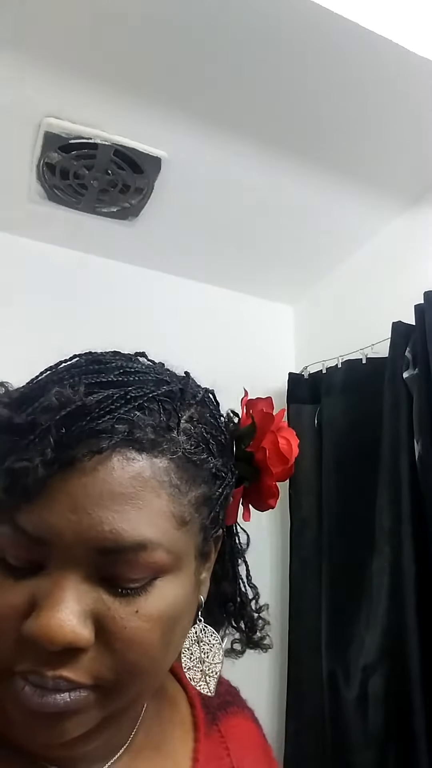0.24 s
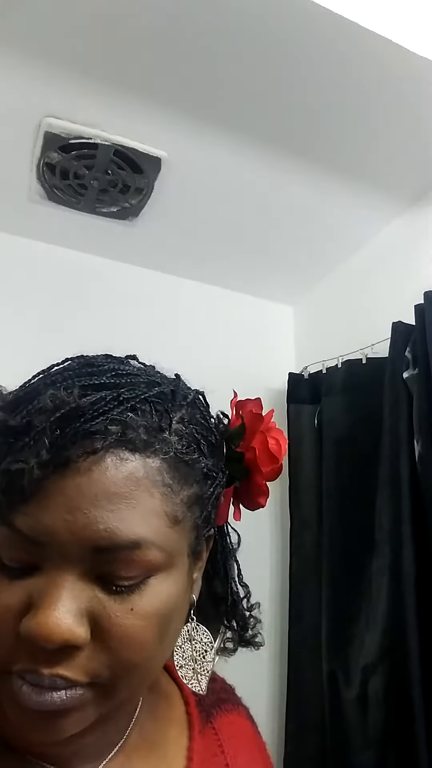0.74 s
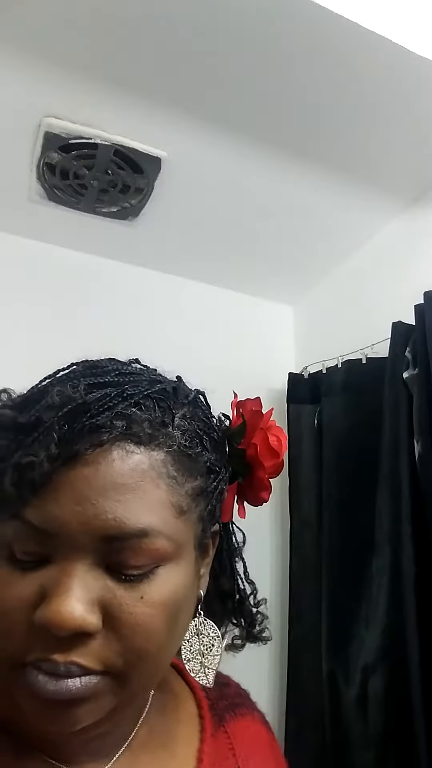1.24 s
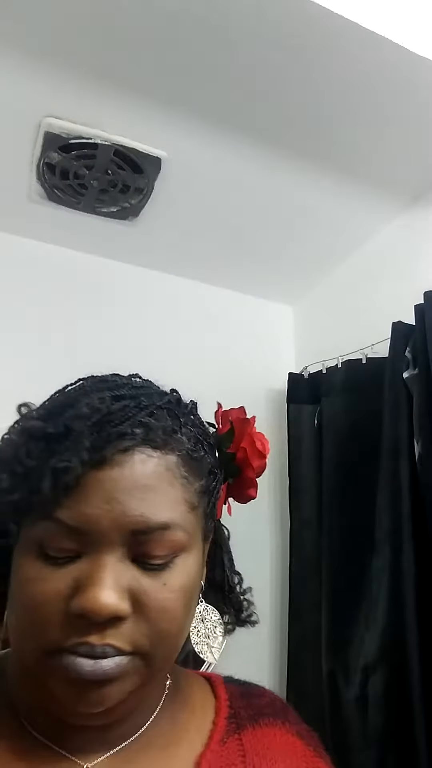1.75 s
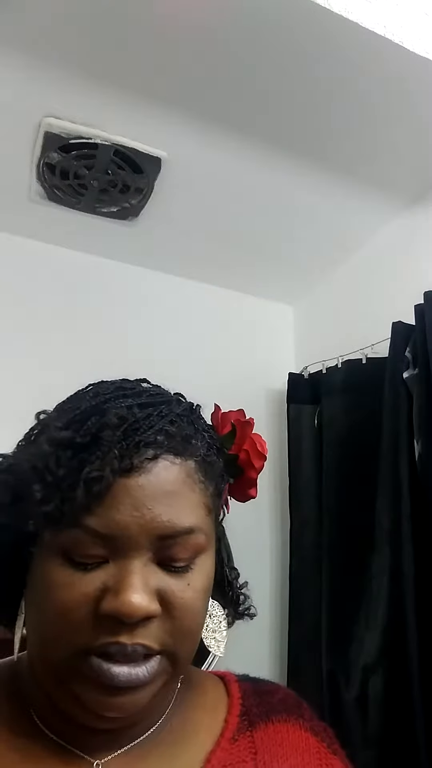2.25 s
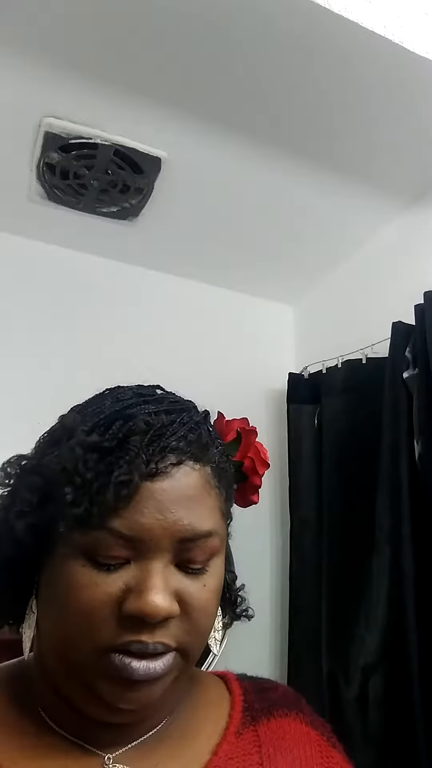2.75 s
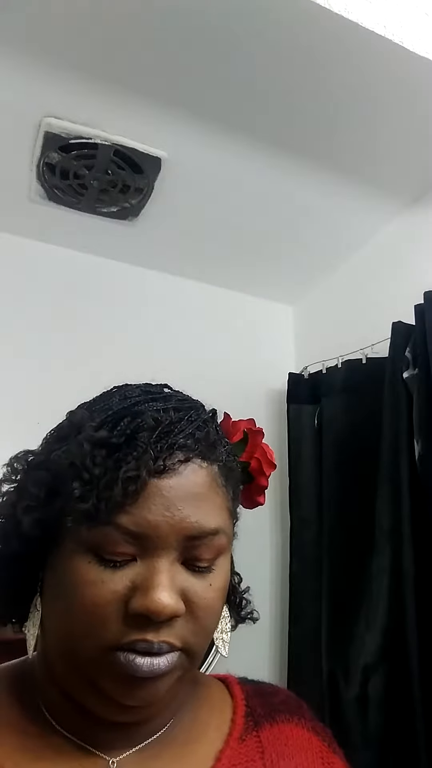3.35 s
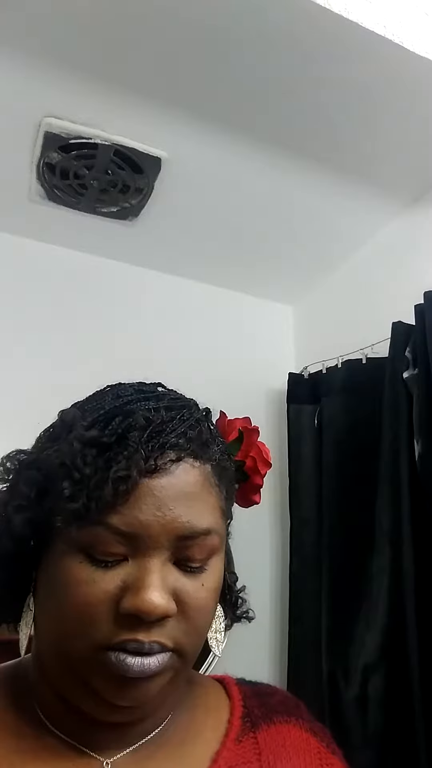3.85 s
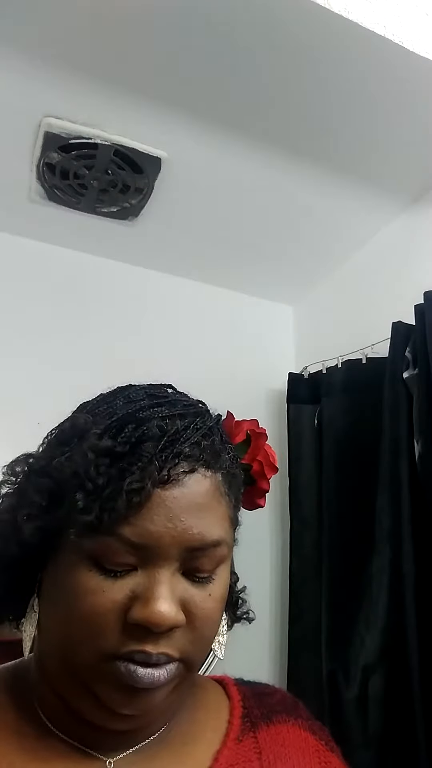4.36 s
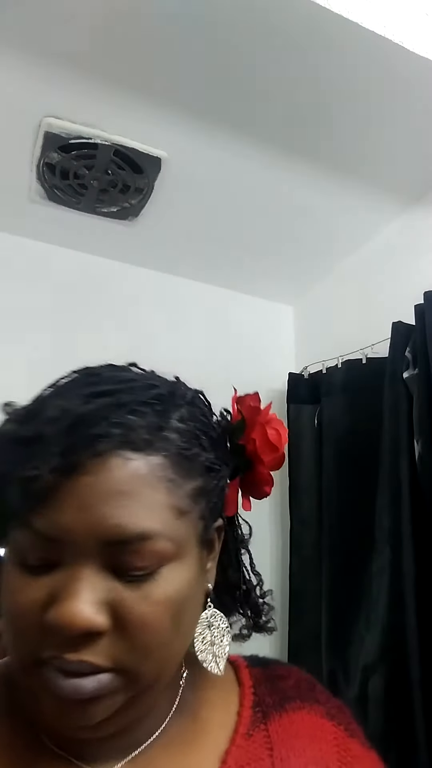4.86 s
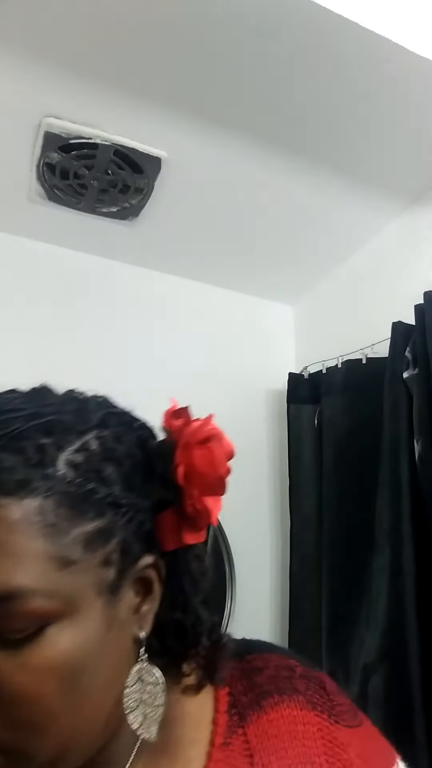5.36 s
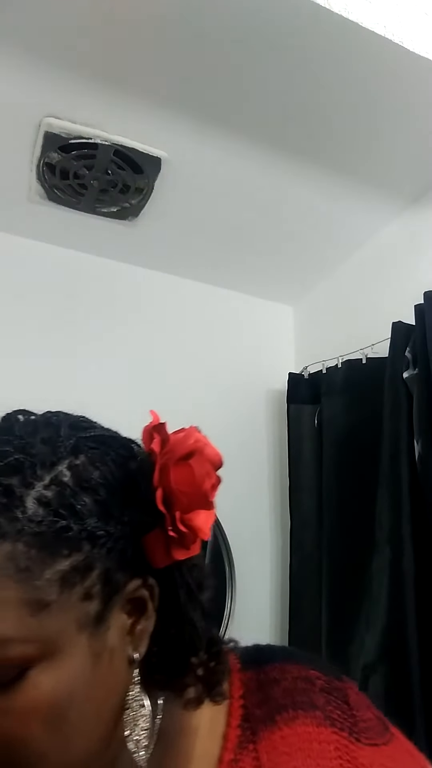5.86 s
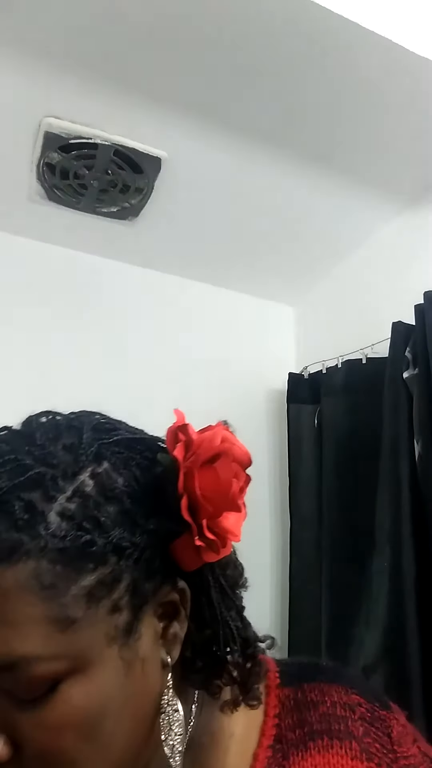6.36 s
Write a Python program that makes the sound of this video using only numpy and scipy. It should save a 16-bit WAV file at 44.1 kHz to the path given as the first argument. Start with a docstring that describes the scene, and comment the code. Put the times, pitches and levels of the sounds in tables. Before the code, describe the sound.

Close stereo phone pickup of makeup items being handled. Hissy rummaging strokes and soft knocks come first, then one bright, hard plastic clack with a short ring. Light ticks and taps continue irregularly, with a tighter cluster of crisp clicks later. Near the end someone leans past, giving deep muffled rumbles, firm scrapes and a heavy thud. Short small-room echoes and very faint air noise surround it all.

```python
"""Short rustling strokes are heard first, as plastic makeup tubes slide over each other in a small room: noise grains.
Dull bumps fall among them; then tubes click together and one lands hard and rings: noise bursts and decaying sines.
At the end someone leans past the nearby phone: a low rumble, a muffled rub and one heavy bump, from swelling noise.
Echoes follow the contacts and the sliding, faint air noise lies under all, and two microphone ports colour it.
"""
import sys
import numpy as np
from scipy import signal
from scipy.fft import rfft, irfft, next_fast_len
from scipy.io import wavfile
from scipy.ndimage import uniform_filter1d

SR = 44100
rng = np.random.default_rng(int(sys.argv[2]) if len(sys.argv) > 2 else 0)


def to_wav(sig):
    """Store sig (one row per channel, or 1-D mono) as 16-bit WAV at the path in sys.argv[1].

    Samples outside -1..1 are clipped; the rate is SR.
    """
    pcm = np.clip(np.atleast_2d(sig), -1, 1) * 32767
    pcm = np.round(pcm).astype(np.int16)
    wavfile.write(sys.argv[1], SR, pcm.T)  # frames by channels


N = 291677  # length [samples]

# One item slid over the others: (time at its fastest [s], half-length [s],
# hiss level of light sliding [dB], scrape level of firm rubbing [dB])
SLIDING_STROKES = [(0.02, 0.094, -45.5, -51), (0.16, 0.1087, -37.5, -42), (0.4, 0.0925, -40, -43.5),
                   (0.52, .04, -41, -38), (0.74, 0.11, -44.5, -43.5), (0.92, 0.0983, -39.5, -40),
                   (1.0, 0.06, -43.5, -37.5), (1.12, 0.063, -44, -44), (1.29, 0.091, -45, -47.5),
                   (1.57, 0.096, -57, -59), (2.02, 0.0417, -58.5, -52.5), (2.255, 0.0208, -54.5, -38.5),
                   (2.335, 0.024, -55.5, -45.5), (2.535, 0.0115, -52.5, -43), (2.79, 0.0228, -62, -55.5),
                   (2.94, 0.0265, -72, -53.5), (3.085, 0.0193, -58.5, -57.5), (3.28, 0.0387, -53, -55.5),
                   (3.455, 0.0107, -55.5, -53.5), (3.61, 0.0281, -57, -55), (3.925, 0.0382, -51.5, -53),
                   (4.25, 0.059, -61, -57), (4.4, 0.118, -80.5, -51), (4.635, 0.0497, -52, -45.5),
                   (4.765, 0.0209, -50.5, -40.5), (4.86, 0.087, -60, -60), (5.365, .02, -45, -40.5),
                   (5.41, 0.0367, -58.5, -52), (5.64, 0.047, -83.5, -49), (5.74, 0.01456, -61.5, -34.5),
                   (5.905, 0.0505, -63.5, -35), (6.028, 0.0309, -49, -33.5), (6.195, 0.0155, -39, -25),
                   (6.24, 0.0271, -44, -33), (6.34, 0.0164, -51.5, -65)]
# The fingers never quite rest on the items: (time [s], hiss level [dB], scrape level [dB])
GRIP_LEVELS = [(0, -49.5, -72), (1.8, -63, -61.5), (1.92, -70.5, -74), (2.15, -60.5, -54.5),
               (2.6, -64, -60.5), (3.15, -79, -62), (3.75, -66.5, -67.5), (4.1, -68, -61.5),
               (5.15, -68.5, -57), (5.5, -75.5, -61.5), (6.1, -69, -45.5), (6.6, -79, -57)]
# The body shifts beside the phone:
# (time at its fastest [s], half-length [s], rumble level [dB], muffled rub level [dB])
BODY_LEANS = [(5.31, 0.0364, -22.5, -47), (5.42, 0.0716, -34, -41), (5.74, 0.0672, -14.5, -31),
              (5.88, 0.0673, -9.5, -20), (6.025, 0.0654, -9.5, -17), (6.2, 0.032, -9, -15),
              (6.4, 0.171, -32, -45)]
# Soft bumps: (time [s], knock level [dB], hollow note [Hz], shell level [dB], decay time [s])
SOFT_BUMPS = [(0.432, -3, 877, -4.5, 0.02), (0.515, -14.5, 401, -20.5, 0.0057),
              (0.7, -20.5, 580, -37.5, 0.0126), (0.815, -10, 882, -20, 0.0053),
              (0.985, -12.5, 667, -16, 0.01), (1.042, -10, 687, -22.5, 0.0124),
              (1.065, -28, 620, -33.5, 0.011), (1.128, -21.5, 565.0, -9, 0.0179),
              (1.156, -15, 630, -16.5, 0.0148), (1.18, -14.5, 507, -28.5, 0.0083),
              (2.242, -20, 733, -19, 0.0058), (2.345, -23, 700, -19.5, 0.0087),
              (2.375, -10.5, 500, -20, 0.00834), (3.314, -24, 617, -36.5, 0.00427),
              (3.581, -27, 852, -44, 0.0076), (4.828, -25, 494, -29.5, 0.006),
              (6.018, -10.5, 522, -19, 0.0138), (6.169, -0.5, 618, -15.5, 0.0203),
              (6.195, -22.5, 937.0, -3, 0.0201), (6.316, -20.5, 575, -24.5, 0.0146)]
# Plastic touching plastic: (time [s], snap level, strongest near 11 kHz [dB],
# shell level, mostly 1-5 kHz [dB], knock level, mostly under 1 kHz [dB])
PLASTIC_CLICKS = [(1.9541, -25.5, -26, -18), (2.1788, -23, -14, -25), (2.2454, -26.5, -28, -16),
                  (2.3018, -23, -29.5, -37.5), (2.3497, -21, -15, -23.0), (2.3602, -19.5, -33.5, -14.5),
                  (2.374, 1.5, 0, -23), (2.3757, 4, -4.5, -21.5), (2.3777, -7, -0.5, -24.5),
                  (2.5041, -30.5, -51, -51.5), (2.541, -20.5, -28, -40), (2.5913, -26.5, -30.5, -19),
                  (2.624, -26.5, -33.5, -25), (2.7176, -36, -31, -23.5), (2.8337, -16.5, -20, -44.5),
                  (2.8846, -31, -27, -42), (2.9177, -34, -27.5, -21.5), (3.007, -28.5, -27, -14.5),
                  (3.1985, -37, -38.5, -39.5), (3.3663, -28.5, -22.5, -34.5), (3.51, -24, -59.5, -52.5),
                  (3.5176, -26, -51, -58.5), (3.5198, -15.5, -61, -54), (3.6817, -26.5, -58.5, -45),
                  (3.6942, -24.5, -51.5, -34), (3.821, -26, -49.5, -25.5), (3.8284, -24, -27.5, -21),
                  (3.874, -30, -29, -16.5), (4.0165, -29, -44.5, -44.5), (4.043, -26.5, -25.5, -31.0),
                  (4.0483, -26, -26.5, -23), (4.0936, -12, -26.5, -26.5), (4.1545, -3, -21.5, -18),
                  (4.217, -31, -22, -18.5), (4.2282, -27, -42, -47.5), (4.2942, -6.5, -22, -26.5),
                  (4.3283, -25.5, -24, -21), (4.4477, -6, -10.5, -8.5), (4.4534, -1, -4.5, -11),
                  (4.457, -7.5, -17.5, -35), (4.5002, -34, -17.5, -14), (4.5721, -27, -36, -43.5),
                  (4.606, -19.5, -38, -31.5), (4.6507, -10, -30.5, -26), (4.658, -16.5, -16.5, -12),
                  (4.7152, -33, -15.5, -15), (4.7208, -11.5, -32, -29), (4.7443, -13.5, -27, -36),
                  (4.7626, -21, -42, -41), (5.0449, -23.5, -54, -52.5), (5.0879, -20.5, -22, -38.5),
                  (5.1102, -38, -25, -24), (5.1971, -26, -48, -42.5), (6.176, -25, -13.5, -8.5),
                  (6.5034, -25, -33, -29)]
# A tube set down hard: (time [s], level of its clear modes [dB], level of its dense clatter [dB],
# level of the thump in the counter [dB])
HARD_BLOWS = [(2.3746, -28.5, 1, 1.5)]
# The clear modes of the tube: (frequency [Hz], level [dB], t60 [s])
TUBE_MODES = [(1437, -9, 0.19), (1514.3, 1.5, .17), (1605.7, 1.5, 0.16), (1743, -4.5, .1),
              (2340, -12.5, 0.17), (3880, -13.5, 0.051), (5163, -15, .13), (7101, -18, .14),
              (8123, -15, .12)]

# Spectra of light sliding and of firm rubbing: (frequency [Hz], level [dB])
HISS_SPECTRUM = [(200, -12.5), (1000, -24.5), (3000, -2), (6000, -1.5), (10000, -0.5), (16000, 0)]
SCRAPE_SPECTRUM = [(40, -26.5), (150, -8), (400, -1.5), (800, 0.5), (1250, -1.5), (1700, 0.5), (3000, -4),
                   (5000, -6.5), (8000, -22.5), (16000, -40.5)]
# Spectra of the low rumble and of the muffled rub: (frequency [Hz], level [dB])
RUMBLE_SPECTRUM = [(20, -34), (38, -9), (58, 2), (95, 0), (150, -10), (260, -23.5), (1000, -71.5)]
RUB_SPECTRUM = [(80, -18), (160, 4), (205, 0.5), (265, 3.5), (380, -1), (520, -16), (900, -14.5),
                (3000, -41.5)]
# Spectra of a soft knock and of a cushioned shell: (frequency [Hz], level [dB])
KNOCK_SPECTRUM = [(30, -21), (80, -8.5), (170, 3.5), (260, 8.5), (320, -7), (390, 8.5), (460, -3.5),
                  (615, 11.5), (740, -7.5), (885, 6), (1100, -10), (1600, -7.5), (5000, -67.5)]
PADDED_SPECTRUM = [(400, -34), (1000, -4.5), (1600, 8.5), (2400, 4), (4000, 0), (6000, -2.5), (9000, -11),
                   (16000, -34)]
# Spectra of a snap, of a bare shell and of what a clicking tube lies on: (frequency [Hz], level [dB])
SNAP_SPECTRUM = [(2000, -36), (5000, -20.5), (7500, -6), (11500, 2.5), (16000, -4)]
SHELL_SPECTRUM = [(400, -14.5), (1100, -8), (1550, 6), (2400, 4), (3400, 3.5), (4500, 2.5), (6000, 1),
                  (9000, -7), (16000, -25.5)]
TAP_SPECTRUM = [(60, -22.5), (200, -1.5), (450, 0), (650, 3.5), (850, 6.5), (1150, 0), (1600, -9.5),
                (5000, -54)]
# Spectrum of the still air: (frequency [Hz], level [dB])
AIR_SPECTRUM = [(15, -68.5), (35, -43), (55, -37.5), (95, -44), (160, -49), (300, -56), (600, -57.5),
                (1500, -73), (5000, -101), (16000, -87.5)]

# Dying time of the room's tail: (frequency [Hz], t60 [s])
ROOM_T60 = [(200, 0.1844), (600, 0.33), (900, 0.1), (1500, 0.2181), (4000, 0.0788), (10000, 0.1712),
            (16000, 0.0047)]
# Strength of the room's tail: (frequency [Hz], level against the direct sound [dB])
ROOM_LEVEL = [(100, -2.5), (600, -1), (2000, 0.5), (6000, -4.5), (11000, -4), (16000, -2.5)]
# Likeness of the two ports, negative for opposite sign: (frequency [Hz], correlation [-1 to 1])
PORT_LIKENESS = [(60, -0.55), (140, -0.2), (300, -0.3), (600, 0.05), (1000, 0.1), (2000, 0.038)]
# The same for movement and thuds near the phone: (frequency [Hz], correlation [-1 to 1])
NEAR_LIKENESS = [(60, -0.81), (140, -0.78), (300, -0.8), (600, 0), (2000, 0)]
# Colour of each port; the left one's narrow duct resonates near 11 kHz: (frequency [Hz], gain [dB])
LEFT_PORT = [(100, 0.5), (700, 4), (2400, 5), (4400, 7.5), (7500, 12.5), (9300, 17.5), (10800, 23.5),
             (13000, 18.5), (16000, 7)]
RIGHT_PORT = [(100, 0.92), (700, -0.17), (3000, 0.021), (7500, -2), (11000, -0.43), (16000, -0.54)]

EDGE_HZ = 15950  # upper band limit
PEAK_SHAPE = 1.275  # exponent that rounds the peak of a movement
SLOWING = 1.099  # time to slow down over time to speed up


def amp(db):
    """Level: twenty decibels are a factor of ten in amplitude."""
    return 10 ** (np.asarray(db) / 20)


def read(points, hz):
    """Interpolation: a spectrum is joined by straight lines over log frequency."""
    f, value = np.transpose(points)
    return np.interp(np.log(hz + 1), np.log(f), value)


def add(mix, s, sound):
    """Superposition: a stereo sound is summed into the mix at time s."""
    part = mix[:, round(s * SR):][:, :sound.shape[1]]
    part += sound[:, :part.shape[1]]


def bins(x):
    """Fourier analysis: the frequencies of the spectrum of x."""
    return np.fft.rfftfreq(x.shape[-1], 1 / SR)


def colour(x, points):
    """Linear filtering: each frequency is scaled by the gain of a spectrum."""
    length = x.shape[-1]
    size = next_fast_len(length, True)
    gain = amp(read(points, np.fft.rfftfreq(size, 1 / SR)))
    return irfft(rfft(x, size) * gain, size)[..., :length]


def swells(rows):
    """Kinematics: each movement speeds up and slows down; one gain curve per dB column."""
    t = np.linspace(0, N / SR, N // 64)
    power = 0
    for s, half_s, *db in rows:
        distance = np.maximum(s - t, (t - s) / SLOWING) / half_s
        power = power + amp(db)[:, None] ** 2 * np.exp(-2 * distance ** PEAK_SHAPE)
    return [np.interp(np.arange(N) / SR, t, np.sqrt(p)) for p in power]


def grip():
    """Residual friction: holding the items gives faint hiss and scrape gain curves."""
    s, *columns = np.transpose(GRIP_LEVELS)
    return amp([np.interp(np.arange(N) / SR, s, db) for db in columns])


def grains(per_s, spread_db, smooth):
    """Stick-slip friction: tiny slips of very unequal size over a smooth hiss."""
    sizes = amp(spread_db * np.minimum(rng.exponential(1, N), 3))
    happens = rng.random(N) < per_s / SR
    slips = sizes * happens * rng.choice([-1, 1], (2, N))
    hiss = smooth * rng.standard_normal((2, N))
    return (slips / slips.std() + hiss) / np.hypot(1, smooth)


def shifting(x, patchy_db):
    """Changing resonance: as the grip moves, other parts resound and the colour drifts in patches."""
    z = signal.stft(x, SR, nperseg=512)[2]
    patches = rng.standard_normal(z.shape[1:])
    patches = uniform_filter1d(patches, size=7, axis=0)  # over frequency
    patches = uniform_filter1d(patches, size=6, axis=1)  # over time
    return signal.istft(z * amp(patchy_db * patches / patches.std()), SR)[1][:, :N]


def rustle(hiss_db=-2, scrape_db=-3.5, catch_db=-43):
    """Sliding friction: light contact hisses in fine grains and catches; firm contact scrapes coarsely."""
    hiss, scrape = np.hypot(swells(SLIDING_STROKES), grip())
    fine = shifting(colour(grains(per_s=3500, spread_db=3.5, smooth=0.71), HISS_SPECTRUM), patchy_db=2.12)
    coarse = shifting(colour(grains(per_s=900, spread_db=4, smooth=0.81), SCRAPE_SPECTRUM), patchy_db=2.5)
    # catches grow more slowly than the hiss, so they stand out only when the sliding is light
    catches = np.sqrt(hiss) * colour(grains(per_s=27, spread_db=6.0, smooth=0), SNAP_SPECTRUM)
    return amp(hiss_db) * hiss * fine + amp(catch_db) * catches + amp(scrape_db) * scrape * coarse


def still_air():
    """Background noise: a steady random signal with the spectrum of the still air."""
    return colour(rng.standard_normal((2, N)), AIR_SPECTRUM)


def handling(rumble_db=4, rub_db=1.5, sliding_db=6.5):
    """Near-source vibration: firm sliding rumbles a little; body movement rumbles and rubs dully."""
    rumble, rub = swells(BODY_LEANS)
    firm_sliding = swells(SLIDING_STROKES)[1]
    rumble = np.hypot(rumble, amp(sliding_db) * firm_sliding)
    low = amp(rumble_db) * rumble * colour(rng.standard_normal((2, N)), RUMBLE_SPECTRUM)
    muffled = colour(grains(per_s=440, spread_db=4.0, smooth=0.83), RUB_SPECTRUM)
    return low + amp(rub_db) * rub * muffled


def room(x, first_s=.002, size=16384):
    """Reverberation: near walls return a dense, short tail, each band dying at its own speed."""
    t = np.arange(size) / SR
    arrives = rng.random((2, size)) < 4000 / SR  # 4000 echoes per second on average
    taps = rng.standard_normal((2, size)) * arrives * (t > first_s)
    hz, when, z = signal.stft(taps, SR, nperseg=128)
    t60 = read(ROOM_T60, hz)[:, None]
    decay = np.exp(-np.log(1000) * when / t60)
    equal_energy = np.sqrt(2 * np.log(1000) / (t60 * SR))
    tail = colour(signal.istft(z * decay * equal_energy, SR)[1] / taps.std(), ROOM_LEVEL)
    return signal.fftconvolve(x, tail[:, :size * 3 // 4], axes=1)[:, :N]


def varied_room(x, turns_per_s=1.3):
    """Reverberation: two random echo patterns take turns, so the short tail varies between contacts."""
    turn = 2 * np.pi * turns_per_s * np.arange(N) / SR
    return room(x * np.cos(turn)) + room(x * np.sin(turn))


def burst(shape, decay, note_hz=None, rise=0.1184, size=8192):
    """Modal excitation: crowded damped modes struck together, at both ports; one note may stand out."""
    t = np.arange(size) / SR
    gain = amp(read(shape, bins(t)))
    if note_hz:
        gain = gain * (1.117 + 2.13 / np.hypot(1, (bins(t) - note_hz) / 70))
    noise = irfft(rfft(rng.standard_normal((2, size))) * gain)
    x = noise * np.exp(-t / decay) * (1 - np.exp(-t / (rise * decay)))
    # the spectrum alone sets the energy, whatever the decay
    return x * np.sqrt(np.mean(gain ** 2) / np.sum(x ** 2, axis=1, keepdims=True))


def bumps():
    """Cushioned impact: a slow push excites a hollow note and a padded shell, with no snap."""
    out = np.zeros((2, N))
    for s, knock_db, note_hz, shell_db, decay in SOFT_BUMPS:
        knock = amp(knock_db) * burst(KNOCK_SPECTRUM, decay, note_hz)
        add(out, s, knock + amp(shell_db) * burst(PADDED_SPECTRUM, decay))
    return out


def thuds(thud_db=1, thud_s=.03, push_db=-13, push_s=.012, thump_s=.009):
    """Structure-borne sound: bumps and blows shake counter and phone; bumps give a push and a longer thud."""
    out = np.zeros((2, N))
    for s, knock_db, *_ in SOFT_BUMPS:
        thud = amp(thud_db) * burst(RUMBLE_SPECTRUM, thud_s)
        push = amp(push_db) * burst(RUB_SPECTRUM, push_s)
        add(out, s, amp(knock_db) * (thud + push))
    for s, _, _, thump_db in HARD_BLOWS:
        thump = burst(RUB_SPECTRUM, thump_s) + burst(RUMBLE_SPECTRUM, thump_s)
        add(out, s, amp(thump_db) * thump)
    return out


def clicks(snap_s=0.000575, shell_s=0.00327, knock_s=0.00663):
    """Hard impact: the contact snaps at once; the shell and what it lies on sound a little longer."""
    out = np.zeros((2, N))
    for s, snap_db, shell_db, knock_db in PLASTIC_CLICKS:
        add(out, s, amp(snap_db) * burst(SNAP_SPECTRUM, snap_s))
        add(out, s, amp(shell_db) * burst(SHELL_SPECTRUM, shell_s))
        add(out, s, amp(knock_db) * burst(TAP_SPECTRUM, knock_s))
    return out


def ringing(clatter_s=0.02496):
    """Free vibration: after a hard blow a few clear modes ring on among many crowded ones."""
    out = np.zeros((2, N))
    t = np.arange(SR // 2) / SR
    for s, blow_db, clatter_db, _ in HARD_BLOWS:
        add(out, s, amp(clatter_db) * burst(SHELL_SPECTRUM, clatter_s))
        for hz, db, t60 in TUBE_MODES:
            phase = 2 * np.pi * rng.random((2, 1))  # each port has its own
            decay = np.exp(-np.log(1000) * t / t60)
            add(out, s, amp(blow_db + db) * decay * np.sin(2 * np.pi * hz * t + phase))
    return out


def ports(x, likeness):
    """Spatial coherence: two unrelated channels are made partly alike, band by band."""
    left, other = np.pad(x, [(0, 0), (0, next_fast_len(N, True) - N)])
    same = np.clip(read(likeness, bins(left)), -1, 1)
    right = irfft(same * rfft(left) + np.sqrt(1 - same ** 2) * rfft(other), len(left))
    return np.array([left, right])[:, :N]


def duct(x, points, size=2048):
    """Causality: minimum-phase resonances ring after a click, never before it."""
    log_gain = np.log(amp(read(points, abs(np.fft.fftfreq(size, 1 / SR)))))
    taps = np.fft.ifft(np.exp(np.conj(signal.hilbert(log_gain)))).real
    return signal.oaconvolve(x, taps[:size // 2])[:N]


def scene():
    """Superposition: the items and their room over the still air, plus what shakes the phone."""
    items = rustle() + bumps() + clicks()
    airborne = items + varied_room(items) + ringing() + still_air()
    shaken = handling() + thuds()
    return ports(airborne, PORT_LIKENESS) + ports(shaken, NEAR_LIKENESS)


def record(dry):
    """Transduction: two close ports of unlike colour; the hardest clicks overload; then the band limit."""
    heard = np.clip([duct(dry[0], LEFT_PORT), duct(dry[1], RIGHT_PORT)], -1, 1)
    low_pass = signal.firwin(401, EDGE_HZ, window=("kaiser", 8), fs=SR)
    return signal.oaconvolve(heard, low_pass[None], "same")


dry = scene()
out = record(dry)
to_wav(out)
```